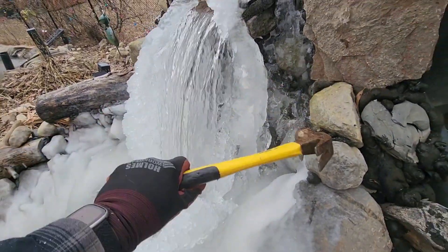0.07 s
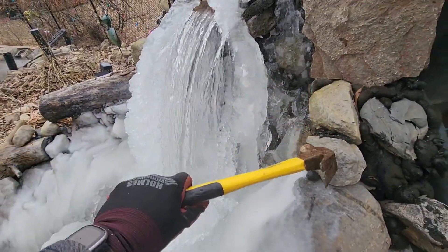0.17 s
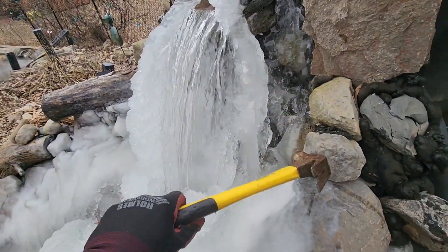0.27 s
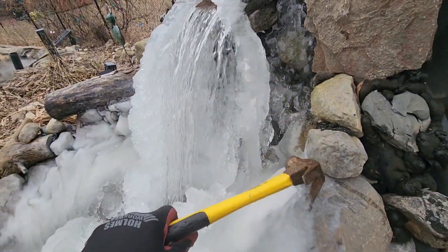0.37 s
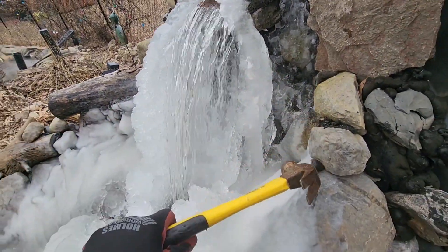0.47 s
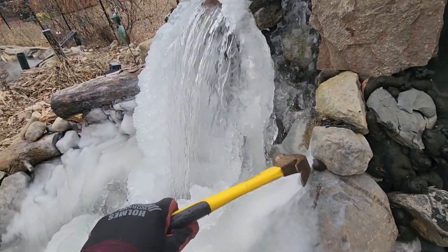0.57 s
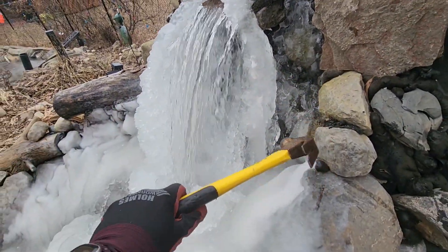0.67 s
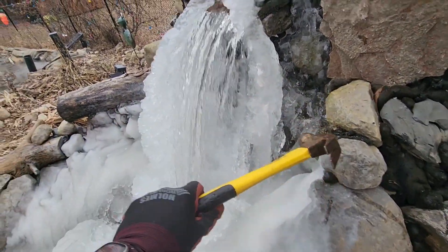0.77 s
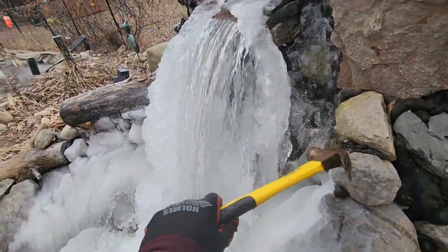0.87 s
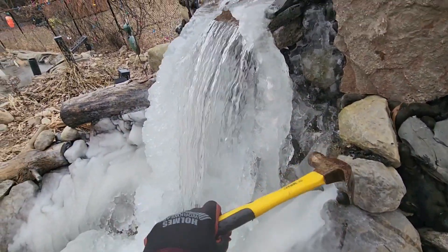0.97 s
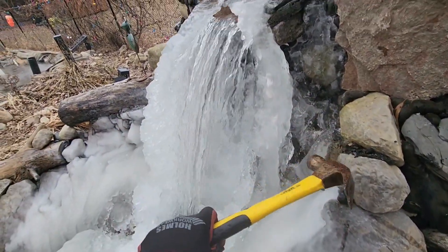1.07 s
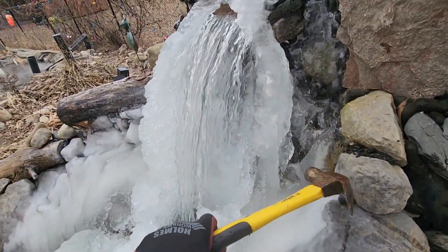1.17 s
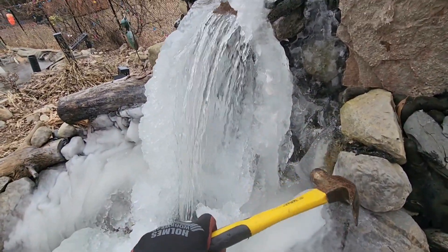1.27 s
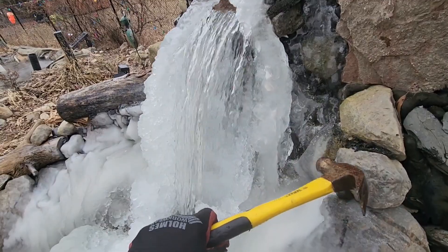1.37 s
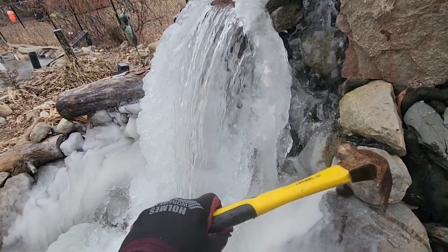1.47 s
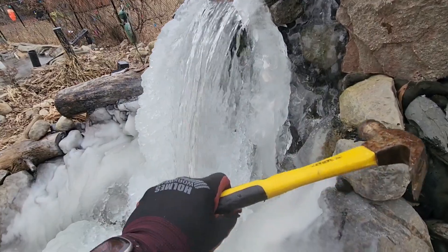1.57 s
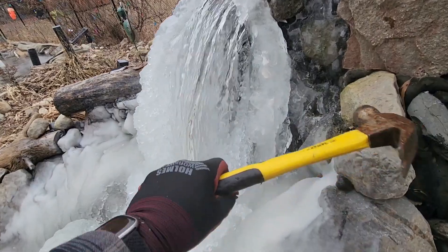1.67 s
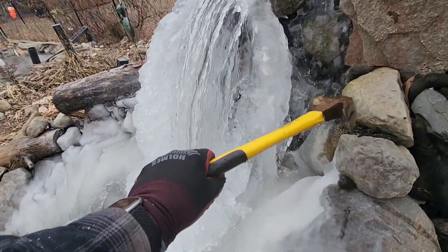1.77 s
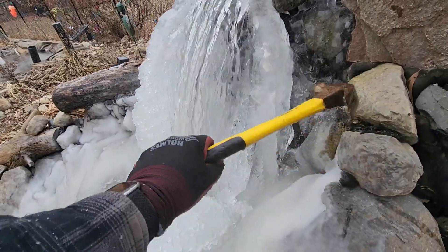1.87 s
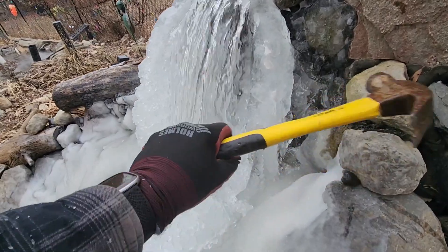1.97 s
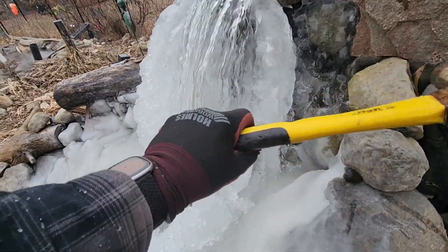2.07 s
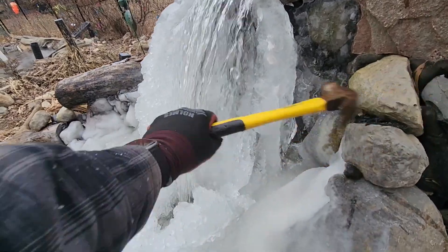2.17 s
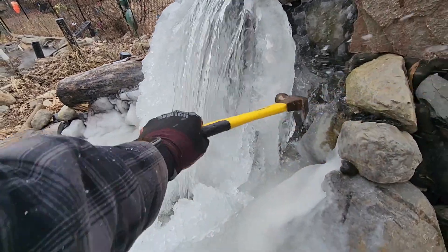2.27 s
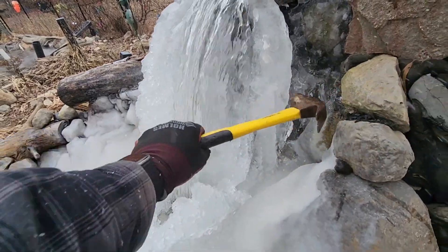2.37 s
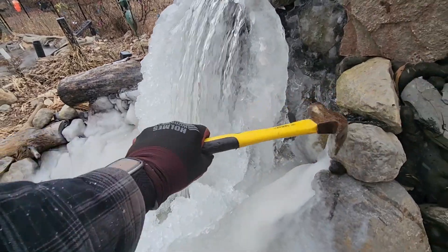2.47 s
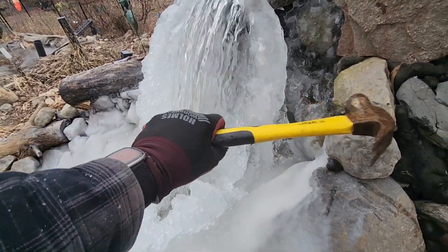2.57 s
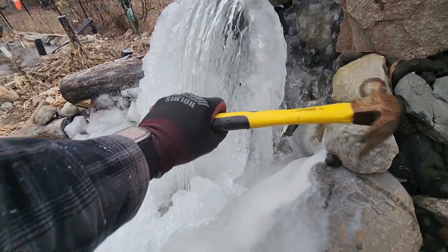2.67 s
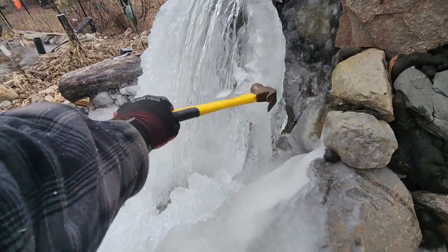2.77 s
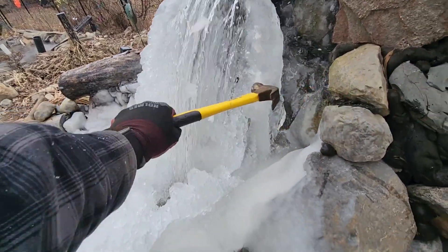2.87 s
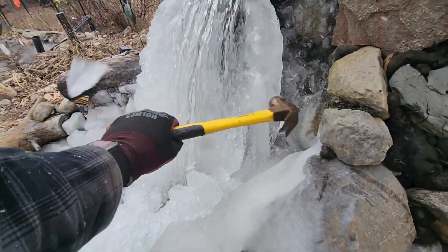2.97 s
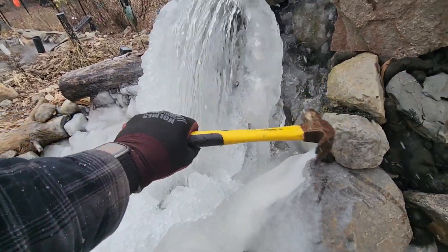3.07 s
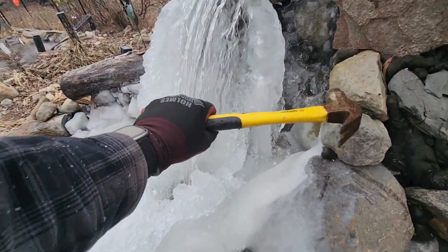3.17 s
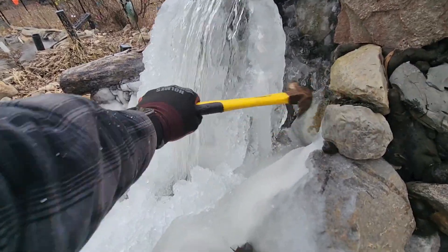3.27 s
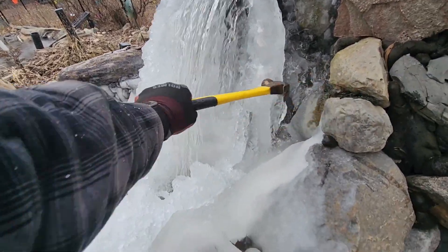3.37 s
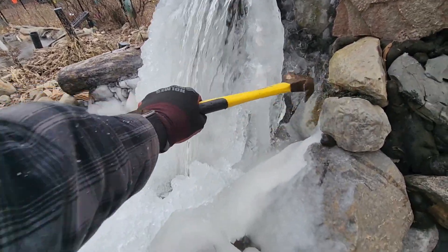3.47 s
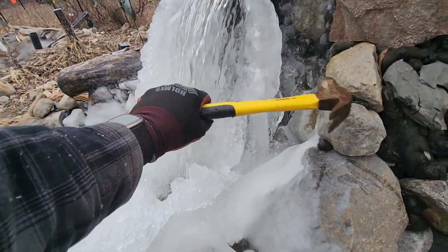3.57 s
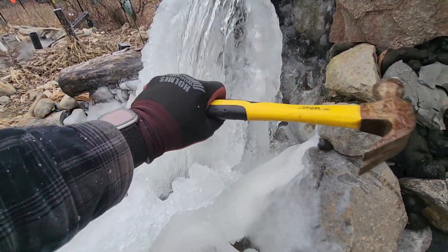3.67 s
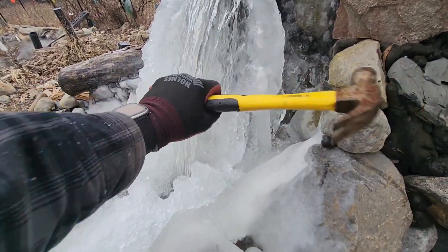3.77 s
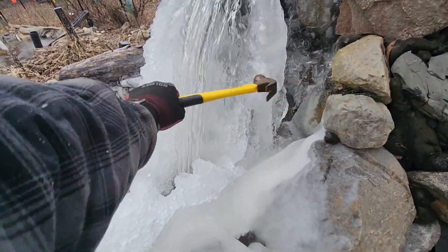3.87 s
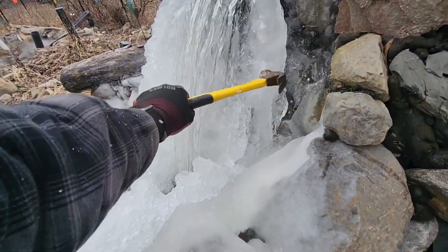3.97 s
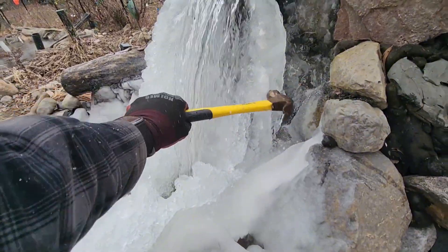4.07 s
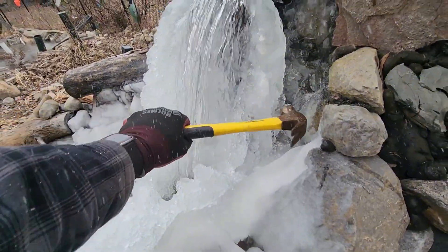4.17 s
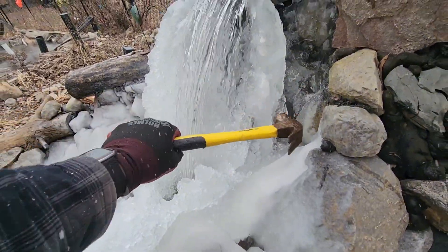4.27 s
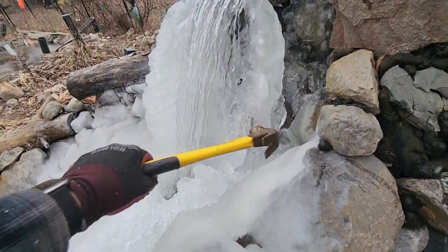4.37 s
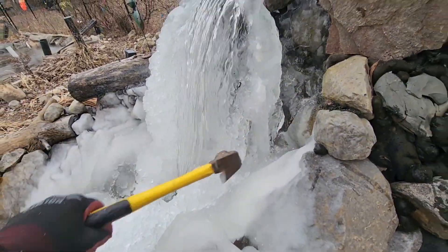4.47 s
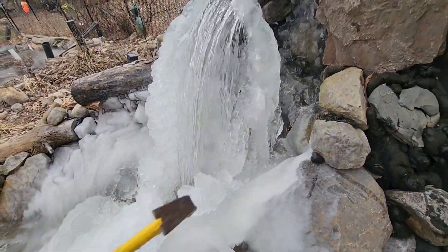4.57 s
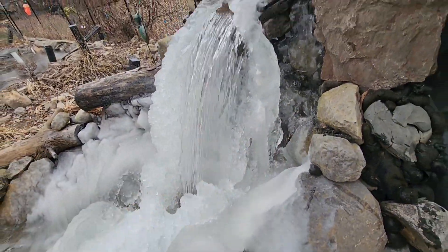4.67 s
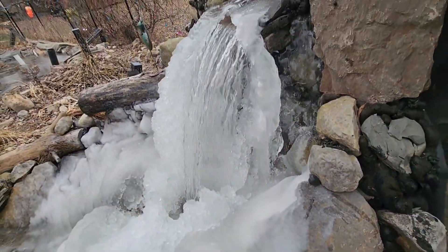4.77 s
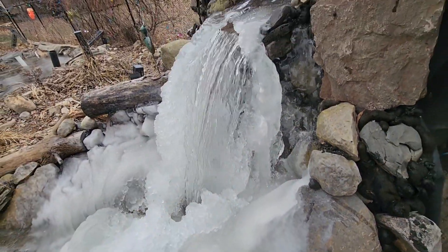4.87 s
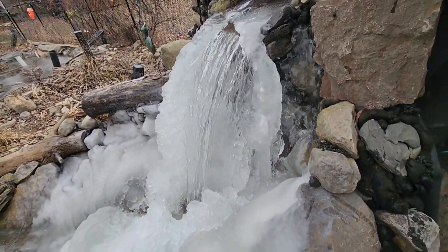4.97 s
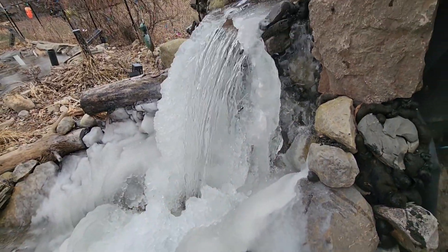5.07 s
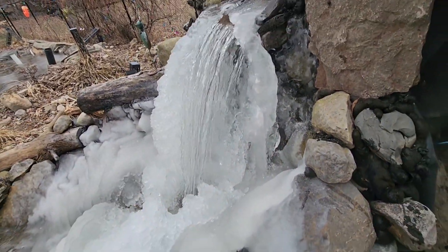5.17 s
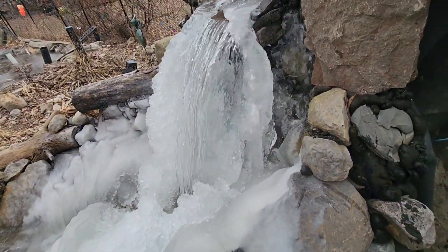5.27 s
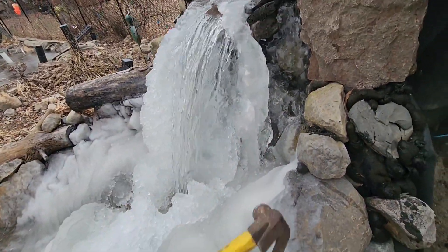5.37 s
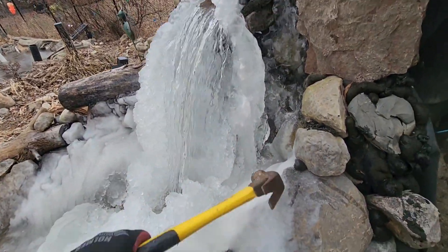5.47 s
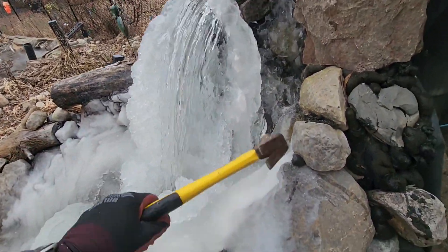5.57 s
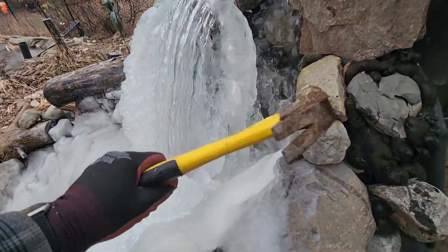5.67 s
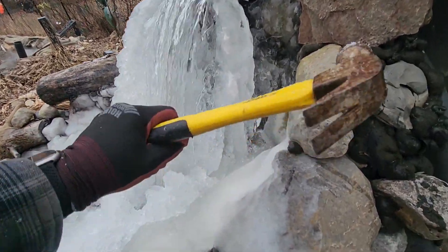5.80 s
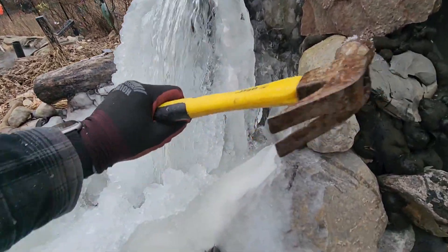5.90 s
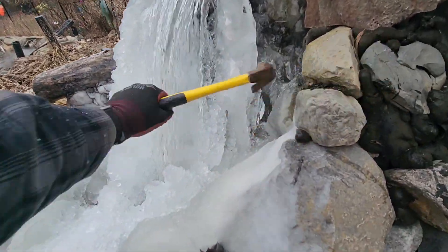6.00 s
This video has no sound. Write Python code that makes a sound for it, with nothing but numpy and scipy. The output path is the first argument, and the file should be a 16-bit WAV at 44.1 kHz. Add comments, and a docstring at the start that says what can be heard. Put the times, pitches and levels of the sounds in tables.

```python
"""At a half-frozen waterfall, water rushes down while a hammer strikes the ice four times, close by.
Each blow is a gritty crack of shaped noise and a hollow knock from the damped modes of the ice shell.
The fall is filtered noise and ringing bubbles; drops splat in the pool, and ice chips and spray tick.
A sleeve brushes the camera, and two small microphone ports colour everything.
Loud blows turn the camera's gain down in a step, and the water swells back slowly."""
import sys
import numpy as np
from scipy import signal
from scipy.fft import rfft, irfft
from scipy.io import wavfile
from scipy.ndimage import uniform_filter1d

SR = 44100
rng = np.random.default_rng(int(sys.argv[2]) if len(sys.argv) > 2 else 0)


def persist_wave(psi):
    """Save psi, clipped to +-1, as 16-bit WAV."""
    counts = np.round(np.clip(psi, -1, 1) * 32767).astype(np.int16)
    wavfile.write(sys.argv[1], SR, np.atleast_2d(counts).T)


N = 266143  # length in samples


def amp(db):
    """Level definition: 20 dB is a factor of ten in amplitude."""
    return 10 ** (np.asarray(db) / 20)


def evened(x):
    """Normalisation by mean power: scales to rms 1."""
    return x / np.sqrt(np.mean(x ** 2) + 1e-20)


def read(points, hz):
    """Interpolation along a logarithmic frequency axis."""
    table_hz, value = np.transpose(points)
    return np.interp(np.log(hz + 1), np.log(table_hz + 1), value)


def add(mix, start_s, sound):
    """Superposition: sums a sound into the mix from its start time."""
    part = mix[:, round(start_s * SR):][:, :sound.shape[-1]]
    part += sound[..., :part.shape[1]]


def band(x, low_hz, high_hz, order=2):
    """Causal Butterworth band-pass filtering."""
    edges = [low_hz, np.clip(high_hz, low_hz + 1, SR / 2 - 1)]
    return signal.sosfilt(signal.butter(order, edges, "band", fs=SR, output="sos"), x)


def colour(x, points, size=2048):
    """Minimum-phase filtering: the Hilbert transform of the log gain supplies a causal phase."""
    hz = abs(np.fft.fftfreq(size, 1 / SR))
    log_gain = np.log(amp(read(points, hz)))
    taps = np.fft.ifft(np.exp(np.conj(signal.hilbert(log_gain)))).real
    return signal.lfilter(taps[:size // 2], [1], x)


# Likeness of the left and right channels: frequency_hz, coherence (1 = identical)
COHERENCE = [(40, 0.96), (250, 0.96), (1000, 0.92), (1400, 0.82), (2200, 0.55), (2700, 0.37), (5500, 0.39),
             (8000, 0.053)]


def spread(pair, lag_ms):
    """Interchannel coherence: the bass is nearly common to both sides, and the right side lags."""
    a, b = rfft(pair)
    hz = np.fft.rfftfreq(pair.shape[1], 1 / SR)
    same = np.clip(read(COHERENCE, hz), -1, 1)
    late = np.exp(-2j * np.pi * hz * lag_ms / 1000)
    right = (same * a + np.sqrt(1 - same ** 2) * b) * late
    return irfft(np.array([a, right]), pair.shape[1])


def burst(length_s):
    """Transient noise: two channels with a quick rise and an exponential decay."""
    u = np.arange(int(8 * length_s * SR)) / (length_s * SR)
    envelope = (1 - np.exp(-10 * u)) * np.exp(-u)
    return rng.standard_normal((2, len(u))) * envelope


def churn(patchy_db, flicker_db):
    """Turbulent noise: its level shifts in patches of time and frequency as strands of water break up."""
    frames = N // 128 + 5
    a, b = rng.standard_normal((2, 2, frames, 257))
    patches = uniform_filter1d(rng.standard_normal((frames, 257)), size=7, axis=0)
    patches = evened(uniform_filter1d(patches, size=8, axis=1))
    flicker = evened(uniform_filter1d(rng.standard_normal((frames, 1)), size=5, axis=0))
    spectrum = (a + 1j * b) * amp(patchy_db * patches + flicker_db * flicker)
    noise = signal.istft(spectrum.swapaxes(1, 2), nperseg=512, noverlap=384)[1]
    return evened(noise[:, :N])


def droplets(per_s, size_db, cycles, low_hz, high_hz, glide, count=36):
    """Bubble resonance: random impacts each ring a decaying tone that rises a little in pitch."""
    out, t = np.zeros((2, N)), np.arange(1500) / SR
    for hz in np.geomspace(low_hz, high_hz, count):
        sizes = amp(size_db * np.minimum(rng.exponential(1, (2, N)), 4))
        hits = sizes * (rng.random((2, N)) < per_s / count / SR)
        age = t * hz / cycles
        ring = np.sqrt(hz) * np.exp(-age) * np.sin(2 * np.pi * hz * t * (1 + glide * age))
        out += signal.oaconvolve(hits, ring[None], axes=1)[:, :N]
    return evened(out)


# Slow drift as the camera moves in front of the fall: time_s, spray_gain_db, rumble_gain_db
DRIFT_GAINS = [(0, 0.7, -5), (0.85, -3, -2), (1.25, 0.1, -1.5), (2.1, -1, 1), (2.8, 0, 3.5), (3.5, 0.9, 2),
               (4.6, -0.1, -2.5), (6.03, 1.6, -2.5)]


def drift(column):
    """Slow amplitude modulation, linear in decibels between the table's times."""
    rows = np.array(DRIFT_GAINS)
    return amp(np.interp(np.arange(N) / SR, rows[:, 0], rows[:, column]))


# Base gains of the fall, before the relative gains and drift of its layers (dB)
SPLASH_DB, SPRAY_DB, RUMBLE_DB = -35.5, -35.7, -46
# Relative spectrum of the falling water: frequency_hz, density_db_per_hz
WATER_SPECTRUM = [(60, -8.5), (170, -2.5), (320, 2), (430, -8), (560, 3), (660, -2.5), (810, 3.5), (920, 0),
                  (1030, 1), (1170, -2.5), (2200, -4), (2600, -6.5), (5000, -8), (16000, -11)]
# Relative spectrum of the plunge under the ice: frequency_hz, density_db_per_hz
PLUNGE_SPECTRUM = [(15, -45), (35, -10), (65, -4.5), (105, -0.5), (160, -13.5), (300, -29), (1000, -66)]


def waterfall():
    """Broadband flow noise: splashing and droplets, finer spray above, the plunge's rumble below."""
    wash = evened(colour(churn(patchy_db=2.0, flicker_db=1.03), WATER_SPECTRUM))
    drops = droplets(per_s=1400, size_db=7, cycles=4.4, low_hz=684, high_hz=6000, glide=0.014)
    water = wash + amp(-8.5) * evened(colour(drops, WATER_SPECTRUM))
    splash = signal.sosfiltfilt(signal.butter(2, 2600, fs=SR, output="sos"), water)
    spray = (water - splash) * drift(column=1)
    rumble = evened(colour(rng.standard_normal((2, N)), PLUNGE_SPECTRUM)) * drift(column=2)
    return amp(SPLASH_DB) * splash + amp(SPRAY_DB) * spray + amp(RUMBLE_DB) * rumble


def bubbling():
    """Bubble resonance: sparse, larger bubbles and sharp spits on the ice stand out from the wash."""
    plops = droplets(per_s=110, size_db=3, cycles=6, low_hz=700, high_hz=2400, glide=.015)
    spits = droplets(per_s=160, size_db=3, cycles=7, low_hz=3000, high_hz=5800, glide=.005)
    return amp(SPLASH_DB - 9.5) * plops + amp(SPRAY_DB - 15) * spits * drift(column=1)


def rocks(x, t60_s, first_s):
    """Diffuse reflection: boulders around the fall return a short, dull scatter of echoes."""
    t = np.arange(SR // 3) / SR
    echoes = rng.standard_normal((2, len(t))) * (rng.random(len(t)) < 2000 / SR)
    decaying = echoes * amp(-60 * t / t60_s) * (t > first_s)
    tail = spread(band(decaying, 150, 3400, order=1), lag_ms=0.024)
    return signal.oaconvolve(x, tail / np.linalg.norm(tail[0]), axes=1)[:, :N]


# Sleeve and hand on the camera, rustle level before a common 11 dB cut:
# start_s, rustle_level_db, length_s, low_edge_hz, high_edge_hz, thud_level_db
BRUSH_EVENTS = [(0.031, -26.5, 0.018, 1600, 12000, -65), (0.079, -28.5, 0.02, 110, 1500, -26),
                (0.116, -37, 0.015, 120, 800, -33), (0.159, -22.5, .008, 170, 1130, -36),
                (.18, -25.5, 0.0062, 230, 1390, -36)]


def sleeve(thud_hz, thud_s):
    """Friction noise of cloth on the camera, with a damped resonance as bumps make its body thud."""
    out, t = np.zeros((2, N)), np.arange(SR // 8) / SR
    thud = np.exp(-t / thud_s) * np.sin(2 * np.pi * thud_hz * t)
    for start_s, level_db, length_s, low_hz, high_hz, thud_db in BRUSH_EVENTS:
        rustle = evened(band(burst(length_s), low_hz, high_hz, order=3))
        add(out, start_s, amp(level_db - 11.0) * rustle)
        add(out, start_s, amp(thud_db) * thud)
    return out


# The largest drops in the pool, level before a common 7.5 dB cut: start_s, level_db, pitch_hz
SPLAT_EVENTS = [(0.284, -23, 1940), (0.501, -26, 1880), (0.796, -23.5, 810), (1.248, -26, 1990),
                (1.87, -19.5, 1730), (4.2, -24.5, 2120), (4.423, -21, 2070), (4.453, -15.5, 1790),
                (4.549, -18.5, 2040), (4.591, -16.5, 2150), (4.945, -12.5, 990), (5.022, -21.5, 1180),
                (5.058, -16.5, 1710)]
DRIPS_PER_S, BUBBLE_RING_S = 2.4, 0.0036


def splats():
    """Impact and bubble resonance: drops slap the pool and trap a ringing bubble."""
    out = np.zeros((2, N))
    # smaller drops at random: start_s, level_db, pitch_hz
    drips = rng.uniform([0, -28, 830], [N / SR, -26, 2230], (round(DRIPS_PER_S * N / SR), 3))
    for start_s, level_db, hz in [*SPLAT_EVENTS, *drips]:
        slap = band(burst(1.3 * BUBBLE_RING_S), hz / 1.23, hz * 1.54)
        t = np.arange(slap.shape[1]) / SR
        bubble = np.exp(-t / BUBBLE_RING_S) * np.sin(2 * np.pi * hz * t * (1 + 3 * t))
        gain = amp(level_db - 7.5)
        add(out, start_s, gain * slap / abs(slap).max())
        add(out, start_s + 0.001174, gain * bubble)  # the bubble closes just after the slap
    return out


# Ticks of ice chips and spits of spray, level before a common 7.5 dB boost:
# start_s, level_db, low_edge_hz
CHIP_EVENTS = [(0.933, -38, 3200), (1.495, -30.5, 4670), (2.8607, -22.5, 4700), (2.8968, -29.5, 4700),
               (3.0288, -28, 4700), (3.121, -27, 4700), (3.1555, -26.5, 4770), (3.169, -27, 4700),
               (3.496, -28, 4700), (3.914, -19.5, 4600), (4.029, -28, 3780), (4.425, -32, 3780)]


def chips():
    """Brief impact noise: splinters of ice and spits of spray tick on the stones."""
    out = np.zeros((2, N))
    for start_s, level_db, low_hz in CHIP_EVENTS:
        add(out, start_s, amp(level_db + 7.5) * band(burst(length_s=0.004), low_hz, 16000))
    return out


# Modes of the hollow ice shell, decay before each blow's ring factor: pitch_hz, level_db, t60_s
SHELL_MODES = [(206, 7, 0.064), (254, -1.5, 0.091), (308, -6.5, 0.13), (368, 8, 0.033), (537, 4.5, 0.066),
               (582, -17, 0.059), (712, -7.5, 0.059), (770, -4, .035), (1133, 4.5, 0.062)]
# A narrow notch of the microphone, heard in the knocks: centre and width
MIC_NOTCH_HZ, MIC_NOTCH_WIDTH_HZ = 461, 33


def knock(low_hz, high_hz, ring, clack_db, clack_hz, push_db, push_hz):
    """Modal excitation: the head shoves the shell, and the struck spot decides which modes answer."""
    t = np.arange(SR // 4) / SR
    modes = sum(amp(level_db - 60 * t / (t60_s * ring)) * np.cos(2 * np.pi * hz * t)
                for hz, level_db, t60_s in SHELL_MODES)
    u = 2 * np.pi * push_hz * t
    shove = modes + amp(push_db) * (1 - u) * np.exp(-u)
    # the surface clacks above the knock, in opposite polarity
    clack = amp(clack_db) * band(shove, clack_hz / 1.7, clack_hz * 1.5)
    body = band(shove, low_hz, high_hz) - clack
    body = band(body, 134, 4400, order=3)  # so small a shell radiates no deep bass
    notch = signal.iirnotch(MIC_NOTCH_HZ, MIC_NOTCH_HZ / MIC_NOTCH_WIDTH_HZ, SR)
    body = signal.lfilter(*notch, body)
    return body / abs(body).max()


# Hammer blows: start_s, crack_level_db, crack_length_s, knock_level_db, knock_low_edge_hz,
# knock_high_edge_hz, ring (factor on t60), crack_left_minus_right_db, clack_level_db, clack_pitch_hz,
# broken_edge_pitch_hz
HAMMER_BLOWS = [(2.2634, -11.5, 0.0016, 1, 455, 744, 0.74, 0.5, -24, 784, 5850),
                (2.812, -9.5, 0.0021, 0.8, 358, 548, 0.67, 2.5, -43, 1000, 2780),
                (3.363, -17, 0.0017, 3.5, 342, 570, 0.62, 7, -17, 810, 3260),
                (3.901, -11.5, 0.0017, 2.5, 207, 437, 0.48, 5.5, -7.5, 696, 2060)]
# Relative spectrum of crushing ice: frequency_hz, density_db_per_hz
CRUSH_SPECTRUM = [(60, -43), (180, -12), (700, 5), (1100, 2.5), (2000, -1.5), (3000, -1.5), (4000, -3.5),
                  (5500, -2.5), (8000, -4.5), (16000, -13.5)]


def hammer():
    """Impact and fracture: steel crushes the surface, then stops on the shell; crumbs fizz briefly."""
    out, t = np.zeros((2, N)), np.arange(SR // 8) / SR
    bite = 1 - np.exp(-(t / 0.00087) ** 2)  # the contact grows as the head sinks in
    fizz = amp(2.0) * np.exp(-t / 0.0045) + amp(-19) * np.exp(-t / 0.0039)
    for (start_s, crack_db, length_s, knock_db, low_hz, high_hz, ring,
         pan_db, clack_db, clack_hz, edge_hz) in HAMMER_BLOWS:
        crush = np.exp(-(t / length_s) ** 4) + fizz
        grit = evened(colour(rng.standard_normal((2, len(t))), CRUSH_SPECTRUM))
        crack = bite * crush * spread(grit, lag_ms=0.022)
        # the broken edge rings
        crack = crack + amp(-3.5) * band(crack, edge_hz / 1.034, edge_hz * 1.066, order=1)
        add(out, start_s, amp([[crack_db + pan_db / 2], [crack_db - pan_db / 2]]) * crack)
        shell = knock(low_hz, high_hz, ring, clack_db, clack_hz, push_db=18, push_hz=500)
        add(out, start_s + 0.00186, amp(knock_db) * shell)
    return out


def scene():
    """Localisation: a lag sets the fall a little to the left; the hammer is nearly straight ahead."""
    blows = hammer() * amp([[.6], [-.6]])
    water = waterfall() + bubbling()
    details = splats() + chips() + sleeve(thud_hz=121, thud_s=0.0089)
    around = spread(water + details, lag_ms=.16)
    return around + blows + amp(-20.5) * rocks(blows, t60_s=0.13, first_s=.008)


# Gain reduction starts above LIMIT_DB and is fully at work KNEE_DB higher
LIMIT_DB, KNEE_DB = -25, 5.5
# The recovery rate is subtracted from the ducking rate at all times
DUCK_DB_PER_S, RECOVER_DB_PER_S = 187.5, 2


def gain_control(x, size=64):
    """Feedback compression: a loud blow pushes the gain down a step; it creeps back over seconds."""
    power = uniform_filter1d((x ** 2).mean(0), size=256)[::size]
    duck_db, ducks = 0, []
    for level_db in 10 * np.log10(abs(power) + 1e-12):
        over = np.clip((level_db - duck_db - LIMIT_DB) / KNEE_DB, 0, 1)
        duck_db = max(duck_db + (DUCK_DB_PER_S * over - RECOVER_DB_PER_S) * size / SR, 0)
        ducks.append(duck_db)
    return x * amp(-np.interp(np.arange(N), np.arange(0, N, size), ducks))


# Response of the left microphone port: frequency_hz, gain_db
LEFT_RESPONSE = [(100, 3.5), (800, -3), (1200, -3.5), (2200, -2), (5000, -3), (6500, -1), (7800, -0.5),
                 (9300, -14), (10600, -8.5), (12000, -2.5), (16000, -3.5)]
# Response of the right microphone port: frequency_hz, gain_db
RIGHT_RESPONSE = [(100, 3.5), (800, -1), (1300, 0), (1600, 7), (1950, 7.5), (2180, 11), (2550, 2.5),
                  (5200, 7), (6500, -4), (7900, -8), (8700, -38), (10800, -25), (12000, -7.5), (15500, -19)]
OVERLOAD = .94  # clipping point, share of full scale
EDGE_HZ = 16050  # upper band limit


def record(dry):
    """Transduction chain: port colour, gain control, overload clipping and a low-pass band limit."""
    ports = np.array([colour(dry[0], LEFT_RESPONSE), colour(dry[1], RIGHT_RESPONSE)])
    held = np.clip(gain_control(ports), -OVERLOAD, OVERLOAD)
    low_pass = signal.firwin(511, EDGE_HZ, window=("kaiser", 9), fs=SR)
    return signal.oaconvolve(held, low_pass[None], "same")


dry = scene()
out = record(dry)
persist_wave(out)
```